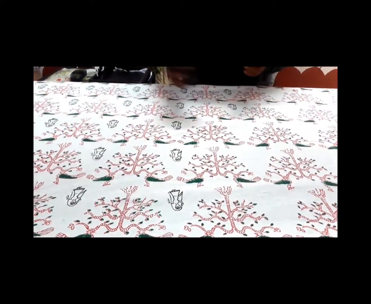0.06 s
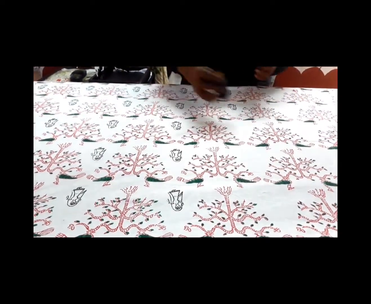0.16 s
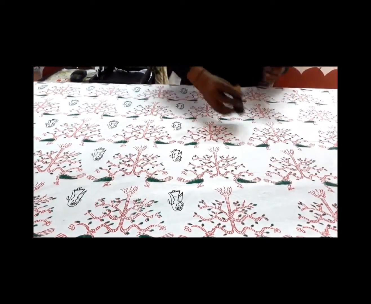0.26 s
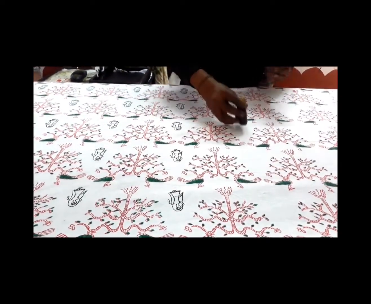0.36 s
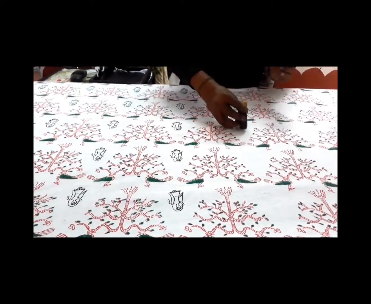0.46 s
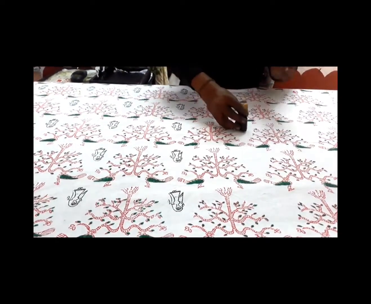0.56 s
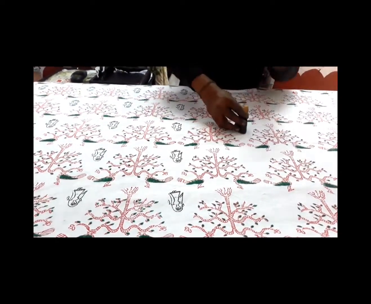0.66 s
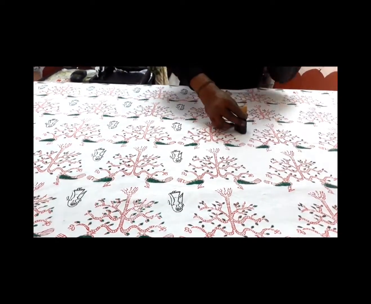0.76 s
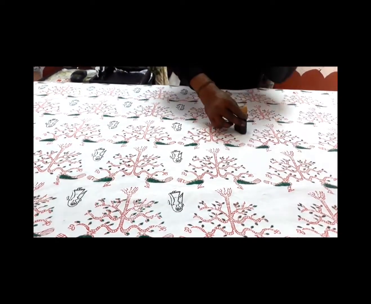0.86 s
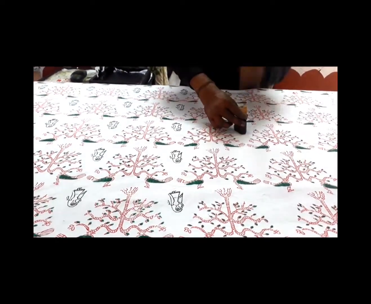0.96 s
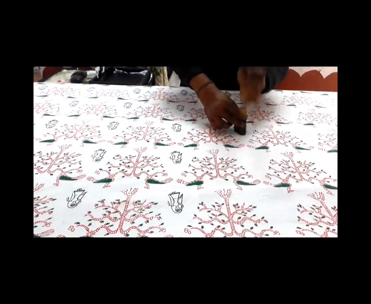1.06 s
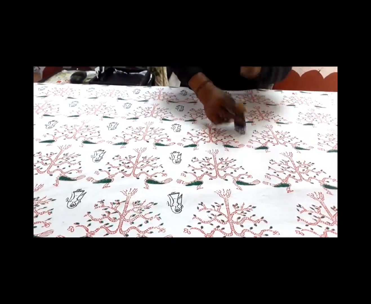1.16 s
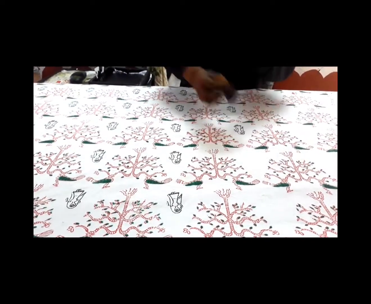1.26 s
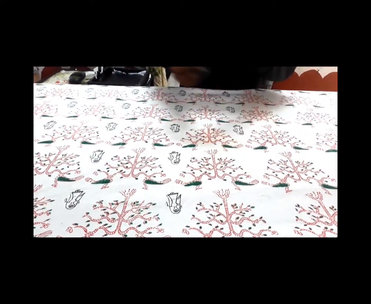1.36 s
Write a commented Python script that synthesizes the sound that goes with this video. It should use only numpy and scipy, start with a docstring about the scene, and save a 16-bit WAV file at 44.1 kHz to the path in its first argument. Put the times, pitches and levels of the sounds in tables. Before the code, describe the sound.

A wooden printing block is tapped on cloth over a padded table, heard close in a quiet workshop. A sleeve brushes at the start; a faint touch at 0.1 seconds, a firm cushioned knock at 0.2, a softer tap at 0.36. Tiny finger clicks near 0.7, a light tap at 0.88, then at 1.07 a rocking double thump with crushed cloth and short low table ring. Faint ticks, hum and hiss continue.

```python
"""Quiet workshop, close by: a small wooden printing block touches down and is tapped three times onto cloth
on a padded table (filtered clicks), then pressed home with a thump that sets the table ringing and rocking
(clicks into resonators, plus noise bursts for shudder and crushed cloth). A sleeve brushes the cloth and the
arm rumbles (shaped noise); faint ticks (short decaying noise bursts), a low hum (sine) and hiss (noise) lie
underneath."""
import sys
import numpy as np
from scipy import signal
from scipy.fft import rfft, irfft
from scipy.io import wavfile

SR = 44100
rng = np.random.default_rng(int(sys.argv[2]) if len(sys.argv) > 2 else 0)


def bounce(signal):
    """Save signal as a 16-bit WAV file at the path given by the first command-line argument."""
    frames = np.transpose(np.atleast_2d(signal))
    limited = np.clip(frames, -1, 1)
    pcm = np.round(limited * 32767).astype(np.int16)
    wavfile.write(sys.argv[1], SR, pcm)


N = 61740  # 1.4 s
T = np.arange(N) / SR  # s


def from_db(db):
    """Decibels to gain."""
    return 10 ** (np.asarray(db) / 20)


def rms_one(x):
    """Scale to unit rms."""
    return x / np.sqrt(np.mean(x ** 2) + 1e-20)


def level(rows):
    """Gain over time, interpolated in dB from (time_s, level_db) rows."""
    return from_db(np.interp(T, *np.transpose(rows)))


def coloured(points):
    """White noise shaped by (freq_hz, level_db) rows, interpolated over log frequency."""
    hz, db = np.transpose(points)
    bin_hz = np.maximum(np.arange(N // 2 + 1) * SR / N, 1)
    gain = from_db(np.interp(np.log(bin_hz), np.log(hz), db))
    return irfft(rfft(rng.standard_normal(N)) * gain, N)


def butter(x, hz, kind, order=2):
    """Causal Butterworth filter."""
    edges_hz = np.clip(np.sort(hz) if np.ndim(hz) else hz, 10, SR / 2 - 1)
    sos = signal.butter(order, edges_hz, kind, fs=SR, output="sos")
    return signal.sosfilt(sos, x + 1e-18)


def click(start_s, level_db):
    """One impulse."""
    return from_db(level_db) * (np.arange(N) == int(start_s * SR))


def ring(x, hz, t60_s):
    """Two-pole resonator: a unit click sets a decaying sine of initial height 1 ringing."""
    radius = from_db(-60 / (t60_s * SR))
    w = 2 * np.pi * hz / SR
    return signal.lfilter([0, np.sin(w)], [1, -2 * radius * np.cos(w), radius * radius], x)


def burst(start_s, hold_s, t60_s):
    """Envelope: a one-millisecond attack, a hold, an exponential release."""
    attack = np.clip((T - start_s) * 1000, 0, 1)
    return attack * from_db(-60 * np.maximum(T - start_s - hold_s, 0) / t60_s)


def taps():
    """Each tap is a cushioned push that the pad soon swallows, plus a wooden click with a faint snap."""
    # dry taps on the padding; drive before filtering, wood click relative to it
    # columns: start_s, drive_db, contact_brightness_hz, pad_resonance_hz, pad_q, wood_click_db
    tap_rows = [(0.1160, -16.5, 450, 261, 2.2, -53), (0.2085, 19, 1013, 128, 0.75, -21),
                (0.357, -3.5, 620, 180, 2.43, -47), (0.8844, 1.5, 730, 160, 1.25, -38)]
    pad_spread_hz, snap_db = 670, -25
    click_band_hz, snap_band_hz = [1460, 3106], [4500, 6120]
    spread_w = 2 * np.pi * pad_spread_hz
    allpass = signal.bilinear([-1, spread_w], [1, spread_w], SR)
    out = 0
    for start_s, drive_db, contact_hz, pad_hz, q, click_db in tap_rows:
        hit = click(start_s, drive_db)
        w = 2 * np.pi * pad_hz
        pad = signal.bilinear([1, 0, 0], [1, w / q, w * w], SR)  # resonant high-pass
        push = signal.lfilter(*pad, butter(hit, contact_hz, "low", order=4))
        snap = from_db(snap_db) * butter(hit, snap_band_hz, "band", order=3)
        wood = butter(hit, click_band_hz, "band", order=4) + snap
        out = out + signal.lfilter(*allpass, push) + from_db(click_db) * wood
    return out


def press():
    """The cloth crushes, the block bottoms out and rocks with short thuds and shudders, and the table rings."""
    # the block bottoms out and rocks: start_s, drive_db, contact_brightness_hz
    blow_rows = [(1.0712, -6, 640), (1.0784, -9.5, 392), (1.1075, -15.5, 590), (1.1096, -15.5, 420)]
    # modes of the block on the table, damped by the hand: freq_hz, level_db, t60_s
    mode_rows = [(41.6, -57, .75), (69.2, -48, 1), (108.2, -33.5, 0.16), (207.5, -43, 0.33),
                 (268.7, -42, 0.23), (365.1, -35.5, 0.18), (444.1, -31, 0.14), (483, -52.5, .14),
                 (514, -49, .11), (616.6, -30, 0.083)]
    # spectrum of the block shuddering on the cloth: freq_hz, level_db_per_hz (relative)
    shudder_rows = [(40, -10), (110, 3), (200, -1), (300, -2), (480, -6.5), (650, -16), (780, -24),
                    (1500, -43.5)]
    # spectrum of cloth crushed under the block: freq_hz, level_db_per_hz (relative)
    crush_rows = [(200, -34), (1000, 4), (1250, -9.5), (1800, -5), (3300, -5.5), (4200, -16.5),
                  (6000, -18.5), (9000, -26)]
    thud_db, thud_band_hz = 17.5, [170, 433]
    shudder_db, crush_db, crush_top_hz = -50.5, -52, 9100

    force = sum(butter(click(start_s, db), hz, "low", order=6) for start_s, db, hz in blow_rows)
    thud = from_db(thud_db) * butter(force, thud_band_hz, "band")
    table = sum(from_db(db) * ring(force, hz, t60_s) for hz, db, t60_s in mode_rows)
    shudder_env = burst(blow_rows[0][0], hold_s=0.036, t60_s=0.26)
    shudder = from_db(shudder_db) * rms_one(coloured(shudder_rows)) * shudder_env
    crush_noise = rms_one(butter(coloured(crush_rows), crush_top_hz, "low"))
    crush = from_db(crush_db) * crush_noise * burst(start_s=1.0676, hold_s=0.0069, t60_s=0.054)
    return thud + table + shudder + crush


def sleeve():
    """The sleeve swishes on the cloth: noise under a moving level."""
    # sleeve brushing over the cloth: time_s, level_db
    swish_level = [(0, -55), (.05, -60.5), (.11, -66), (.16, -77), (1.06, -92), (1.1, -64.5), (1.14, -78),
                   (1.175, -65), (1.21, -76), (1.27, -72), (1.4, -78)]
    # swish spectrum: freq_hz, level_db_per_hz (relative)
    swish_rows = [(500, -31), (1200, -7.5), (2000, -3.5), (2800, 3), (3500, -5), (4300, -14), (6500, -19.5),
                  (9000, -44.5), (15000, -29)]
    return level(swish_level) * rms_one(coloured(swish_rows))


def arm():
    """The arm's weight rumbles in the table: low noise under a moving level."""
    # arm shifting on the padded table: time_s, level_db
    rumble_level = [(0, -76), (.04, -54), (.075, -58), (.1, -59.5), (.15, -67.5), (.28, -81), (.38, -62),
                    (.43, -82.5), (.55, -70), (.8, -77.5), (.93, -72), (.968, -57), (.99, -86), (1.15, -77),
                    (1.22, -68.5), (1.4, -75.5)]
    # rumble spectrum: freq_hz, level_db_per_hz (relative)
    rumble_rows = [(22, -33.5), (45, -11), (80, 8), (120, -3.5), (220, -1.5), (380, -13), (600, -17),
                   (1200, -38)]
    return level(rumble_level) * rms_one(coloured(rumble_rows))


def finger():
    """A fingertip shifts on the block: one band-passed click."""
    return butter(click(0.6772, -24), [1320, 3550], "band", order=3)


def ticks():
    """Faint ticks: short decaying noise bursts in a dull and a bright band, with a notch in the treble."""
    # some double (dull then bright), some almost only a bright tick: start_s, dull_db, bright_db
    tick_rows = [(0.0941, -31.5, -36.5), (0.3240, -36, -35), (0.4100, -33, -35.5), (0.6883, -55, -40),
                 (0.8370, -31.5, -38), (1.1220, -58, -39), (1.2420, -33.5, -37.5), (1.2734, -44.5, -37.5),
                 (1.309, -49.5, -43)]
    gap_s, t60_s = 0.0078, 0.0044
    dull_band_hz, bright_band_hz = [1900, 6500], [3800, 12600]
    dip_hz, dip_q = 8360, 2.24
    dull_hits = sum(click(start_s, db) for start_s, db, _ in tick_rows)
    bright_hits = sum(click(start_s + gap_s, db) for start_s, _, db in tick_rows)
    fade = from_db(-60 / (t60_s * SR))  # per sample
    hits = np.array([dull_hits, bright_hits]) + 1e-18
    decay = signal.lfilter([np.sqrt(1 - fade ** 2)], [1, -fade], hits)  # unit energy per unit click
    dull, bright = decay * rng.standard_normal((2, N))
    tick_noise = butter(dull, dull_band_hz, "band") + butter(bright, bright_band_hz, "band")
    return signal.lfilter(*signal.iirnotch(dip_hz, dip_q, SR), tick_noise)


def hum():
    """A low sine whose level wavers slowly at random."""
    hum_hz, rms_db, waver_rms_db = 204.5, -78.5, 4.5
    waver = rms_one(butter(rng.standard_normal(N), 4.1, "low"))
    return from_db(rms_db + waver_rms_db * waver) * np.sqrt(2) * np.sin(2 * np.pi * hum_hz * T)


def room_noise():
    """Steady stereo noise, centred in the bass and wider in the hiss."""
    # mid spectrum: freq_hz, level_db_per_hz (relative)
    floor_rows = [(25, -17.5), (60, -2.5), (130, -12), (210, -5), (330, -3.5), (550, -11.5), (900, -13),
                  (1800, -16.5), (2950, -14), (3900, -21.5), (6800, -27), (8200, -34), (10500, -28.5),
                  (15500, -29.5)]
    # stereo width: freq_hz, side_minus_mid_db
    width_rows = [(100, -25.5), (700, -11), (2800, -11.5), (5000, -6), (9000, -3.5), (15000, -7)]
    mid_rms_db = -66
    width_hz, width_db = np.transpose(width_rows)
    side_rows = [(hz, db + np.interp(np.log(hz), np.log(width_hz), width_db)) for hz, db in floor_rows]
    mid, side = coloured(floor_rows), coloured(side_rows)
    return from_db(mid_rms_db) * np.array([mid + side, mid - side]) / np.std(mid)


def scene():
    """All the handling is close and in the centre; only the room noise is wide."""
    handling = taps() + press() + sleeve() + arm() + finger() + ticks()
    return handling + hum() + room_noise()


def record(dry):
    """The top is cut steeply by an elliptic low-pass."""
    cutoff_hz, ripple_db, stop_db = 15800, 0.1, 70
    sos = signal.ellip(10, ripple_db, stop_db, cutoff_hz, fs=SR, output="sos")
    return signal.sosfilt(sos, dry)


dry = scene()
out = record(dry)
bounce(out)
```